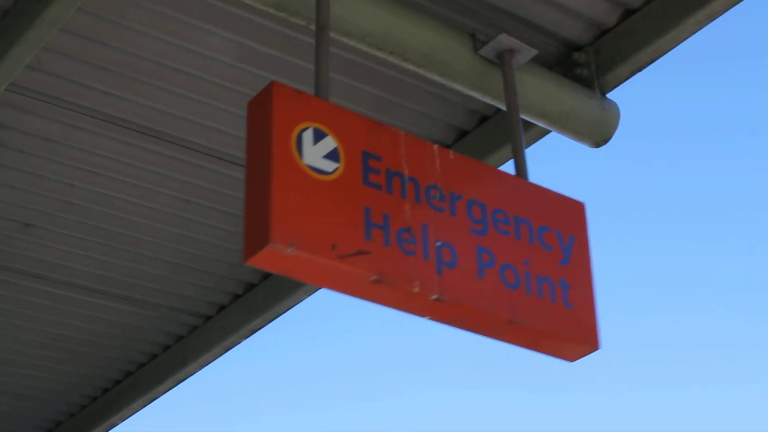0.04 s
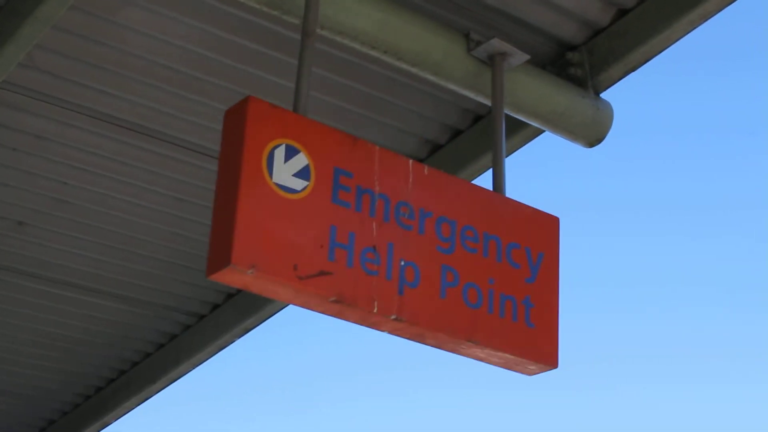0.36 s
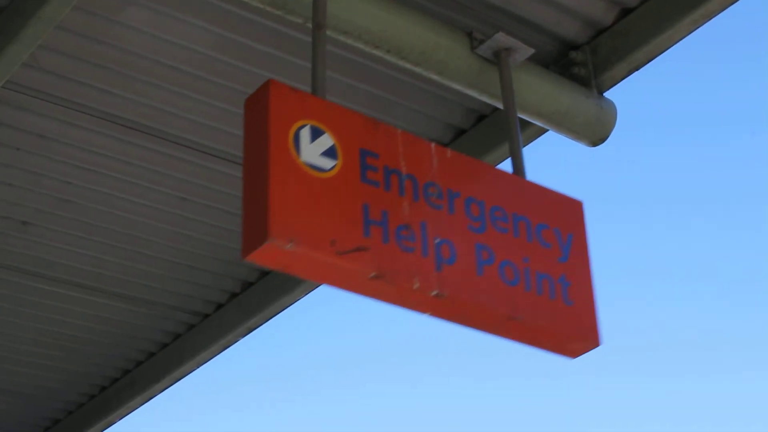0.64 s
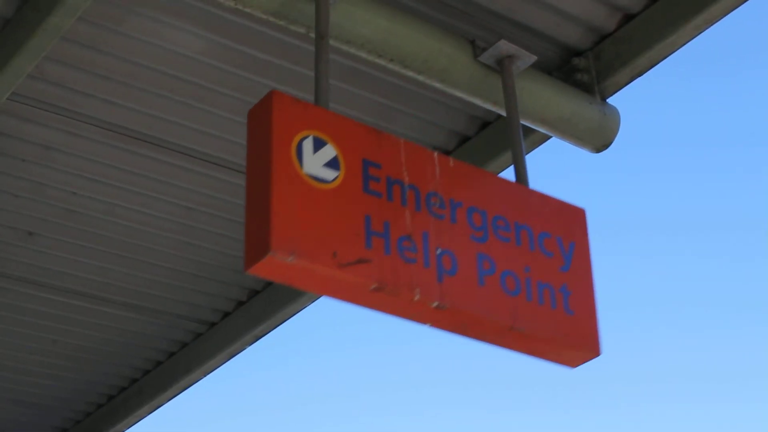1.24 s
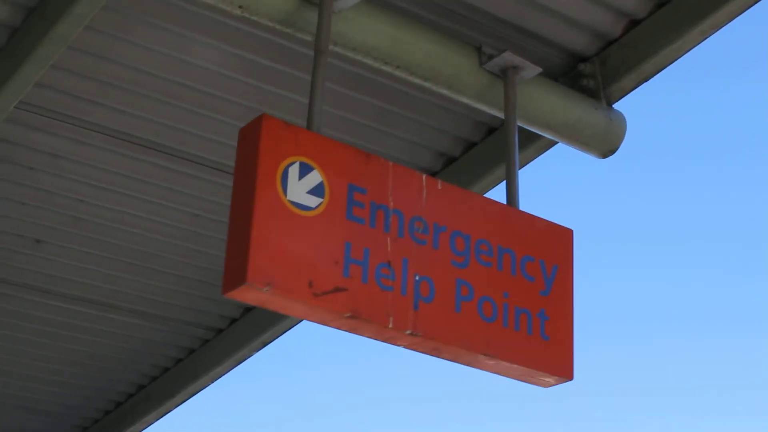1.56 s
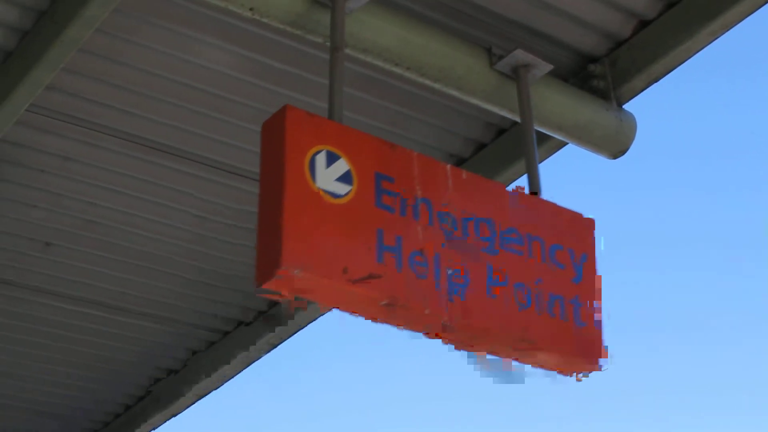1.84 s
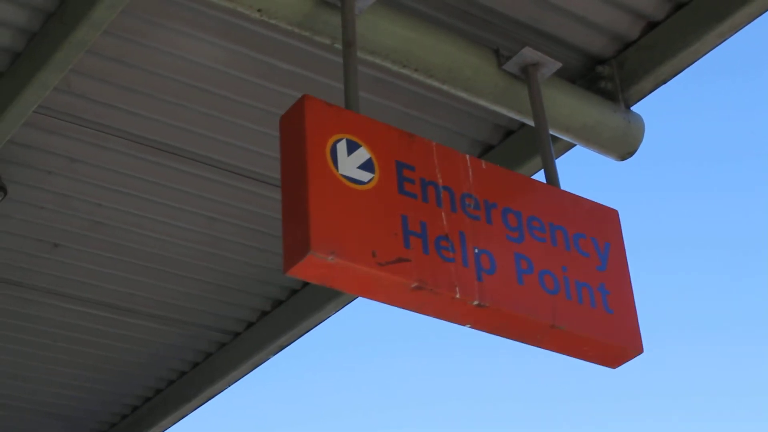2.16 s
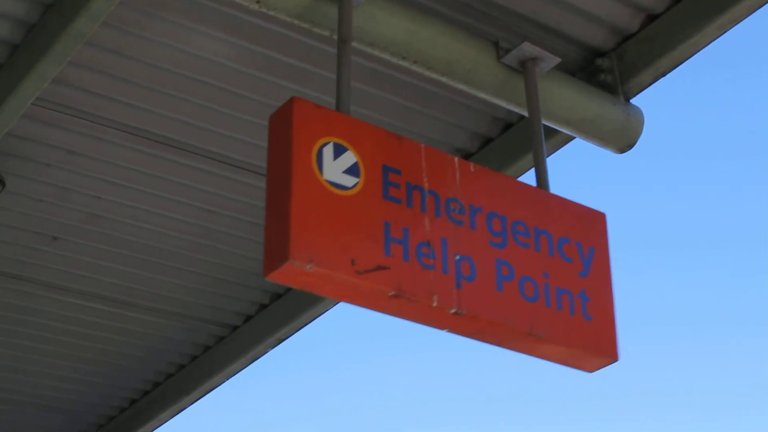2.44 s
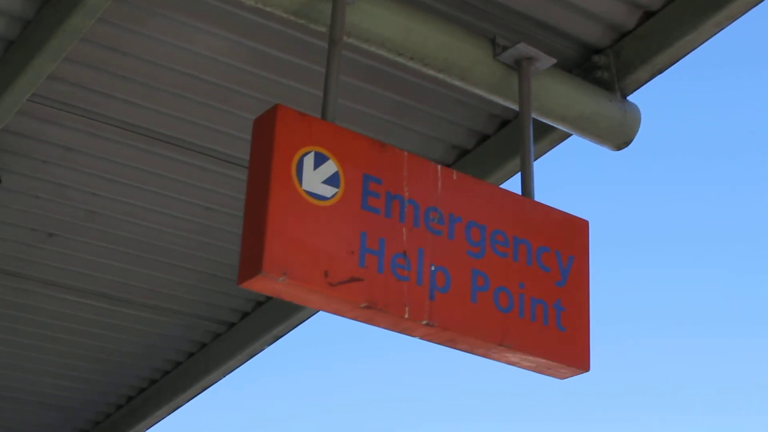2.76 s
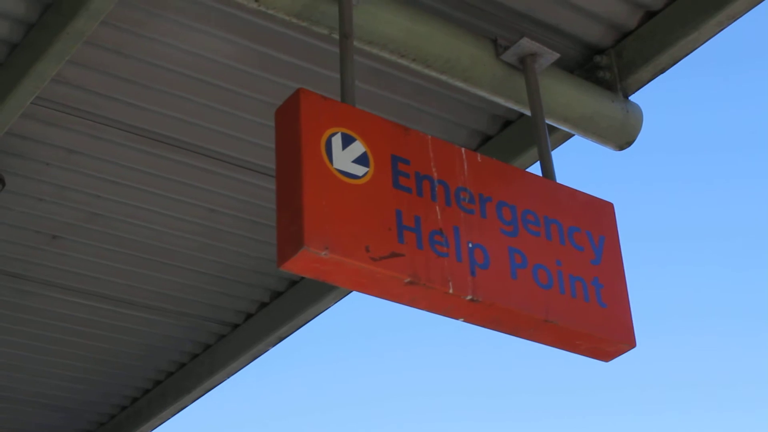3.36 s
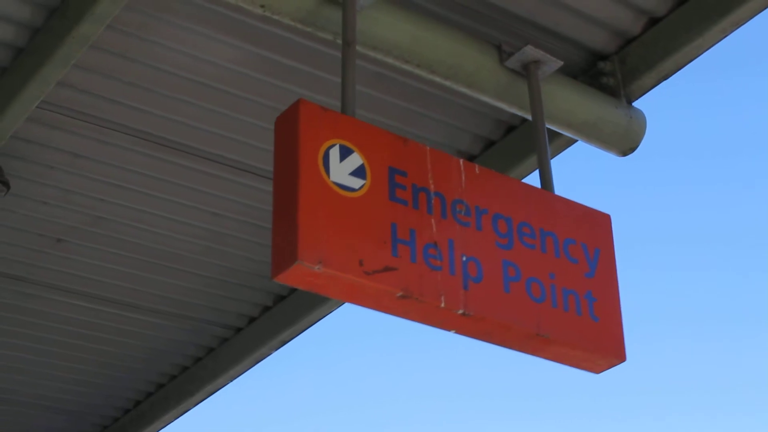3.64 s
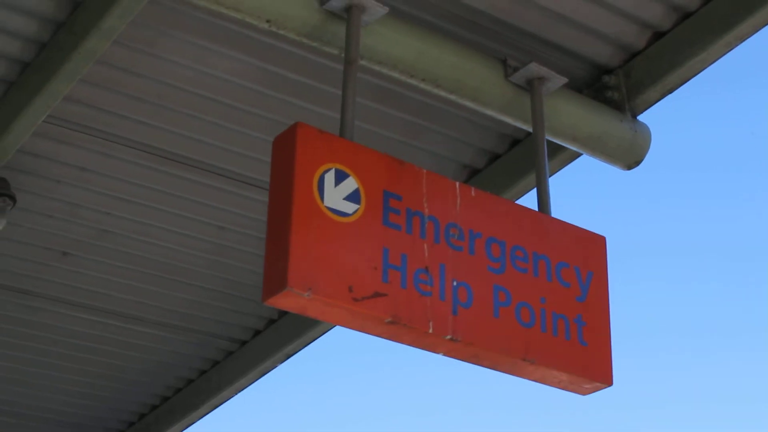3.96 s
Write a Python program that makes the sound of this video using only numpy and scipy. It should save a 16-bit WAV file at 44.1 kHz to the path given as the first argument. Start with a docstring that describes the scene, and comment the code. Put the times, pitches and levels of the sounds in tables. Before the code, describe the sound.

Short runs of high squeaks from a swinging metal sign, with gusty wind rumble.

```python
"""Under a platform roof, a metal sign swings on a dry hinge. Stick-slip friction makes the hinge squeak
once a swing, in a run of short slips; on the way back it scrapes faintly. The roof reverberates.
Turbulent gusts buffet the microphone and now and then overload the recorder.
Behind it all lies a distant rush of wind and traffic that swells halfway through."""
import sys
import numpy as np
from scipy import signal
from scipy.fft import rfft, irfft, next_fast_len
from scipy.io import wavfile
from scipy.ndimage import map_coordinates

SR = 44100
rng = np.random.default_rng(int(sys.argv[2]) if len(sys.argv) > 2 else 0)


def master(y):
    """Save y as 16-bit WAV."""
    cut = np.clip(np.atleast_2d(y).T, -1, 1)
    pcm = np.round(cut * 32767)  # scale
    wavfile.write(sys.argv[1], SR, pcm.astype(np.int16))


N = 176400
TIME = np.arange(N) / SR


def amp(db):
    """The decibel law: 20 dB is a tenfold amplitude."""
    return 10 ** (np.asarray(db) / 20)


def unit(x):
    """Normalisation to rms 1."""
    return x / np.sqrt(np.mean(x ** 2) + 1e-20)


def at_frequency(points, hz):
    """Interpolation of (frequency, value) points on a logarithmic frequency axis."""
    knots_hz, values = np.transpose(points)
    return np.interp(np.log(hz + 1), np.log(knots_hz + 1), values)


def contours(rows):
    """Linear interpolation in time: one curve for each column after the first."""
    times, *columns = np.transpose(rows)
    return [np.interp(TIME, times, column) for column in columns]


def wobble(rate, size=N):
    """Smooth random modulation: a spline through `rate` Gaussian knots a second."""
    return map_coordinates(rng.standard_normal(4000), [np.arange(size) * rate / SR], mode="mirror")


def filtered(x, response):
    """Linear filtering: the spectrum is multiplied by a frequency response."""
    size = next_fast_len(N + SR // 4)
    return irfft(rfft(x, size) * response(np.fft.rfftfreq(size, 1 / SR)), size)[:N]


def noise(spectrum):
    """Spectral shaping of white noise, scaled to rms 1."""
    return unit(filtered(rng.standard_normal(N), lambda hz: amp(at_frequency(spectrum, hz))))


def envelope(t, length, attack_s, release_s):
    """Linear rise, hold until `length`, then exponential decay."""
    return np.clip(t / attack_s, 0, 1) * np.exp(-np.clip((t - length) / release_s, 0, 30))


def add(track, start, x):
    """Superposition of x on the track from `start` seconds."""
    i = max(0, round(start * SR))
    track[i:i + len(x)] += x[:N - i]


# Slips of the hinge, levels at the source: (time [s], duration [s], pitch [Hz], fundamental [dB],
# overtones [dB], overtone tilt [dB/octave], friction hiss [dB])
SLIPS = [(0.023, 0.0057, 1503, -38, -30, 2, -38), (0.045, .036, 1510, -28, -30, -1.5, -46),
         (0.088, 0.015, 1533, -23, -31, 0, -42), (0.126, 0.012, 1508, -27, -26, 1.5, -50),
         (0.147, 0.014, 1515, -21, -24.5, 5, -47), (0.166, 0.029, 1492, -23, -26.5, -19, -45),
         (0.207, 0.02, 1464, -21.5, -23, 4.5, -39), (0.24, 0.029, 1464, -20, -30, -21, -47),
         (1.225, 0.0099, 1410, -24.5, -27.5, -8, -45), (1.245, 0.029, 1453, -23.5, -26, -3.5, -39),
         (1.269, 0.012, 1453, -13, -32, 9, -42), (1.285, 0.043, 1458, -14, -29, -4, -43),
         (1.322, 0.037, 1483, -20.5, -21, -2, -45), (1.364, 0.029, 1445, -17.5, -39, -11, -42),
         (1.401, 0.031, 1439, -20.5, -27.5, -1.5, -43), (1.437, 0.017, 1414, -20.5, -46, -3, -54),
         (1.477, 0.019, 1464, -22.5, -28, -2, -52), (1.504, 0.018, 1440, -34, -35, -15, -59),
         (1.591, 0.016, 1432, -45, -34, -3, -54), (2.446, .01, 1500, -41, -31, 3, -48),
         (2.464, 0.031, 1500, -36, -31.5, 0, -51), (2.512, 0.034, 1521, -32, -21, 2, -39),
         (2.556, 0.039, 1532, -23.5, -23, -17.5, -54), (2.61, 0.044, 1506, -32, -35, -5, -52),
         (2.673, 0.013, 1447, -26, -29.5, -1, -48), (2.732, 0.009, 1482, -27, -27, -2, -47),
         (2.752, .014, 1420, -39, -40, -8, -50)]
# Harmonics from the second upward: (relative level [dB])
OVERTONES = [1, 1.5, -2.5, -5.5, -4, -13.5, -11, -19, -21.5]
# Spectrum of the friction hiss: (frequency [Hz], relative level [dB])
FRICTION_SPECTRUM = [(1500, -20), (3500, -9), (4600, 3), (7000, -5), (9500, 0), (11500, -4), (14500, -4),
                     (16000, -12)]


def hinge_squeaks():
    """Stick-slip oscillation: the hinge grips and lets go almost periodically, giving harmonics."""
    out, size = np.zeros(N), SR // 8
    t, harmonics = np.arange(size) / SR, np.arange(2, len(OVERTONES) + 2)
    friction = noise(FRICTION_SPECTRUM)
    sag_per_s, flutter_db, rasp_db = 0.088, 2, -16.5
    for start, length, hz, fundamental_db, overtones_db, tilt, hiss_db in SLIPS:
        jitter = 0.011 * wobble(267, size) + 0.007 * wobble(1434, size)
        pitch = hz * (1 - sag_per_s * (t - length / 2) + jitter)
        phase = 2 * np.pi * np.cumsum(pitch) / SR
        gains = amp(np.array(OVERTONES) + tilt * np.log2(harmonics))
        overtones = np.zeros(size)
        for k, gain in zip(harmonics, gains):
            flutter = amp(flutter_db * wobble(90, size))
            overtones += gain * flutter * np.sin(k * phase + 0.35 * wobble(412, size))
        overtones = unit(overtones) * (1 + amp(rasp_db) * wobble(1291, size))
        hiss = friction[round(start * SR):][:size] * (1 + np.cos(phase))  # pulses once a cycle
        fundamental = np.sin(phase + 0.14 * wobble(518, size))
        fundamental = unit(fundamental * amp(1.9 * wobble(170, size)))
        slip = amp(fundamental_db) * fundamental + amp(overtones_db) * overtones + amp(hiss_db) * hiss
        slip *= envelope(t, length, attack_s=0.0036, release_s=0.012)
        add(out, start, roof_reverberation(slip))
    return out


# Light scrapes of the mounts: (time [s], duration [s], source level [dB])
SCRAPES = [(0.687, 0.019, -26), (0.844, .02, -33), (1.186, .012, -30), (2.047, 0.026, -25.5)]
# Spectrum of a scrape: (frequency [Hz], relative level [dB])
SCRAPE_SPECTRUM = [(500, -20), (1000, 14), (2500, -1), (4500, 0), (8000, -7), (12000, -14), (15500, -13)]


def mount_scrapes():
    """Sliding friction: between squeaks the mounts rub in soft bursts of noise."""
    rubbing = sum(amp(db) * envelope(TIME - start, length, attack_s=0.002, release_s=0.018)
                  for start, length, db in SCRAPES)
    return rubbing * noise(SCRAPE_SPECTRUM)


# Thin whistles of the hinge: (time [s], duration [s], pitch [Hz], source level [dB])
WHISTLES = [(0.07, .04, 14500, -46), (0.09, .035, 13300, -45), (0.68, 0.023, 14050, -49),
            (0.797, 0.025, 7690, -42), (0.865, .02, 15550, -55), (1.345, .07, 14600, -43),
            (2.85, .04, 14400, -44), (2.85, .04, 10850, -47), (3.04, .04, 14600, -47),
            (3.037, .025, 13100, -42), (3.04, .015, 10400, -42)]


def hinge_whistles():
    """Random frequency modulation roughens each very high tone of the hinge."""
    out, size = np.zeros(N), SR // 8
    t = np.arange(size) / SR
    for start, length, hz, db in WHISTLES:
        pitch = hz * (1 + 0.007 * wobble(700, size))
        tone = unit(np.sin(2 * np.pi * np.cumsum(pitch) / SR))
        add(out, start, amp(db) * tone * envelope(t, length, attack_s=0.0043, release_s=0.0083))
    return out


# Reverberation under the roof: (frequency [Hz], time to decay by 60 dB [s])
ROOF_T60 = [(500, 0.4), (1500, 0.38), (3000, 0.38), (6000, 0.34), (9000, 0.21), (14000, 0.047)]


def roof_reverberation(x):
    """Reverberation: reflections from roof and platform follow the direct sound; treble dies first."""
    direct_db, reflected_db = -5.5, -9.5
    hz, t, spectra = signal.stft(rng.standard_normal(SR // 2), SR, nperseg=256)
    decay = amp(-60 * t / at_frequency(ROOF_T60, hz)[:, None])
    _, tail = signal.istft(spectra * decay, SR, nperseg=256)
    out = amp(reflected_db) * signal.fftconvolve(x, tail / np.linalg.norm(tail))
    add(out, 0, amp(direct_db) * x)
    return out[:N]


# Gusts on the microphone: (time [s], duration [s], thump level [dB], bright edge level [dB])
GUSTS = [(0.0, 0.036, -8, -15.5), (0.05, 0.029, -13, -21), (0.174, 0.015, -14, -30),
         (0.244, 0.036, -1.5, -11), (0.311, 0.013, -2.5, -14.5), (0.399, 0.047, -12.5, -26),
         (0.451, 0.055, -8, -16), (0.526, 0.02, -8.5, -13.5), (0.562, 0.045, -13.5, -16.5),
         (0.659, 0.0076, -18.5, -26), (0.738, 0.027, -24.5, -30.5), (0.788, 0.017, -17, -30),
         (0.848, 0.02, -22.5, -35), (0.997, 0.014, -9.5, -22.5), (1.04, 0.017, -12.5, -22),
         (1.102, 0.047, -10.5, -41), (1.191, 0.023, -24.5, -37), (1.28, 0.054, -22, -47),
         (1.346, 0.018, -13.5, -22), (1.422, 0.035, -17, -34), (1.47, 0.03, -12.5, -17.5),
         (1.536, .014, -9, -35), (1.583, 0.021, -11.5, -17), (1.627, 0.035, -11.5, -17.5),
         (1.671, 0.018, -10, -14.5), (1.719, 0.038, -21, -40), (1.835, 0.0048, -18.5, -42),
         (2.034, 0.0056, -16.5, -39), (2.086, 0.017, -21.5, -45), (2.169, 0.02, -14.5, -49),
         (2.202, 0.018, -12.5, -24), (2.271, 0.087, -17, -26), (2.377, 0.016, -13.5, -29),
         (2.461, 0.011, -16, -32), (2.589, 0.018, -20.5, -52), (2.714, 0.009, -23.5, -41),
         (3.272, 0.051, -18.5, -38), (3.699, 0.0097, -28.5, -40), (3.743, 0.045, -26.5, -48)]
# Spectra of the thump and of its edge: (frequency [Hz], relative level [dB])
THUMP_SPECTRUM = [(20, -13), (45, -24.5), (80, -3), (130, 3), (200, 0.5), (350, -5), (550, -19),
                  (1000, -36.5), (3000, -97)]
EDGE_SPECTRUM = [(150, 0), (350, 4), (550, 0.5), (1000, -7.5), (1600, -17.5), (2300, -26), (3200, -36),
                 (8000, -48), (16000, -68)]


def gusts():
    """Turbulent pressure on the microphone: each gust is a low thump with a brighter, tearing edge."""
    attack_s, crackle_db = 0.0043, 4.5
    shapes = np.array([envelope(TIME - start + attack_s / 2, length, attack_s, release_s=0.014)
                       for start, length, _, _ in GUSTS])
    _, _, thump_db, edge_db = np.transpose(GUSTS)
    thumps = amp(thump_db) @ shapes * noise(THUMP_SPECTRUM)
    crackle = unit(noise(EDGE_SPECTRUM) * amp(crackle_db * wobble(260)))
    return thumps + amp(edge_db) @ shapes * crackle


# Eddies bursting on the microphone: (time [s], envelope peak [dB], frequency [Hz], width [cycles])
EDDIES = [(0.259, 2, 330, 0.45), (0.327, 1.5, 230, 0.93), (0.458, 0.5, 400, 0.34), (0.4904, 6, 480, 0.33),
          (0.5334, 0.5, 1390, 1.1), (0.541, -18, 600, .7), (0.565, -5, 590, 0.5), (0.6645, 2, 270, 0.4),
          (1, -18, 276, 0.53), (1.0124, 6.5, 460, 0.44), (1.429, -7, 480, 0.48), (1.499, -1, 513, 0.47),
          (1.5435, -2, 600, 0.21), (1.587, 3, 326, 0.33), (1.5995, 1.5, 447, 0.4), (1.6516, 6, 487, 0.37),
          (2.318, -8.5, 553, 0.85), (3.748, -15, 2400, 1.5)]


def eddy_pops():
    """Pressure transients: a bursting eddy is one quick swing, a cycle or two long."""
    out, t = np.zeros(N), np.arange(-SR // 100, SR // 100) / SR
    for centre, db, hz, cycles in EDDIES:
        window = 1 / np.cosh(np.clip(2 * hz * t / cycles, -30, 30))
        add(out, centre + t[0], -amp(db) * window * np.sin(2 * np.pi * hz * t))
    return out


# Wind rumble beneath the gusts: (time [s], relative level [dB])
RUMBLE = [(0, -27.5), (0.35, -25), (0.6, -21.5), (0.92, -29), (1.25, -27.5), (1.55, -24.5), (1.72, -27),
          (1.93, -38), (2.25, -24.5), (2.5, -32), (2.8, -41.5), (3.05, -34.5), (3.2, -41.5), (3.35, -28.5),
          (3.55, -40), (3.8, -30.5), (4, -44)]


def wind_rumble():
    """Flow noise at the microphone: a low rumble whose level wavers at random."""
    gain_db, swing_db = 2, 3.3
    contour_db, = contours(RUMBLE)
    level = amp(contour_db + gain_db + swing_db * wobble(21.47))
    # (frequency [Hz], relative level [dB])
    spectrum = [(20, -51), (50, -2), (110, 1), (200, -4.5), (350, -14.5), (800, -26), (2500, -55.5)]
    return level * noise(spectrum)


# Swell of the far wind and traffic: (time [s], relative body level [dB], relative hiss level [dB])
RUSH = [(0, -36.5, -47.5), (0.2, -34, -54), (0.45, -36, -50), (0.7, -37.5, -52.5), (0.93, -35, -50),
        (1.15, -31.5, -47.5), (1.45, -31, -47.5), (1.7, -32.5, -50.5), (1.95, -31.5, -50),
        (2.2, -27, -44.5), (2.6, -27.5, -44), (3.1, -29.5, -44), (3.3, -29, -45), (4, -30.5, -45.5)]
# Spectra of the body and of the hiss: (frequency [Hz], relative level [dB])
BODY_SPECTRUM = [(100, -9), (240, -6), (295, 2.5), (350, -6.5), (600, -3), (1050, 1), (1400, -1),
                 (2000, -7), (3000, -16.5), (5000, -53)]
HISS_SPECTRUM = [(1200, -44), (2500, 4), (4000, 1), (6000, -1), (7000, -4), (8500, -10), (12000, -10.5),
                 (15500, -18)]


def distant_rush():
    """Incoherent sources add to broadband noise: far wind and traffic merge into a body and a hiss."""
    body_gain_db, hiss_gain_db = 2, 6.5
    body_db, hiss_db = contours(RUSH)
    body = amp(body_db + body_gain_db + 0.6 * wobble(12)) * noise(BODY_SPECTRUM)
    hiss = amp(hiss_db + hiss_gain_db + 0.1 * wobble(24)) * noise(HISS_SPECTRUM)
    return body + hiss


def gain_control(x):
    """Dynamic compression: peaks over a threshold pull the gain down; it recovers at a steady rate."""
    threshold_db, slope, attack_s, recovery_db_per_s = -4.5, 0.61, 0.018, 22
    excess_db = np.maximum(20 * np.log10(np.abs(x) + 1e-9) - threshold_db, 0)
    recovery_db = recovery_db_per_s * TIME
    reduction_db = np.maximum.accumulate(slope * excess_db + recovery_db) - recovery_db
    pole = np.exp(-1 / (attack_s * SR))
    return x * amp(-signal.lfilter([1 - pole], [1, -pole], reduction_db))


def scene():
    """Superposition of the sign under its roof, the far rush and the wind at the microphone."""
    sign = hinge_squeaks() + roof_reverberation(mount_scrapes() + hinge_whistles())
    return (sign + distant_rush() + gusts() + wind_rumble() + eddy_pops())[None]


def record(dry):
    """Overload and band limiting: the recorder ducks and clips strong gusts and cuts the top treble."""
    knee_sharpness, band_limit_hz = 14, 15750
    x = gain_control(dry[0])
    clipped = x / (1 + np.abs(x) ** knee_sharpness) ** (1 / knee_sharpness)
    return filtered(clipped, lambda hz: hz < band_limit_hz)[None]


dry = scene()
out = record(dry)
master(out)
```